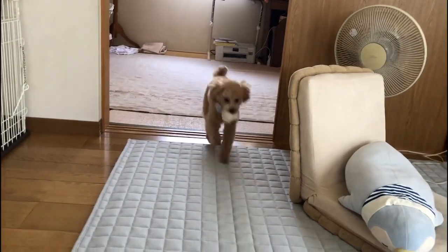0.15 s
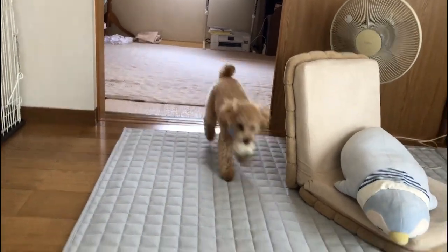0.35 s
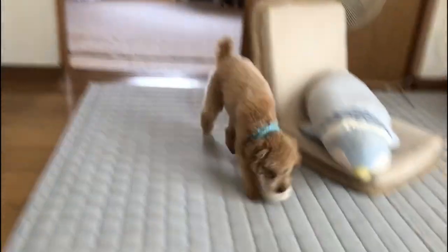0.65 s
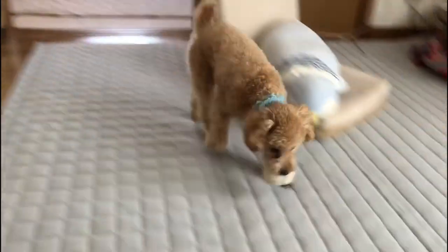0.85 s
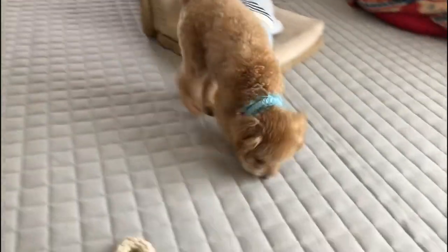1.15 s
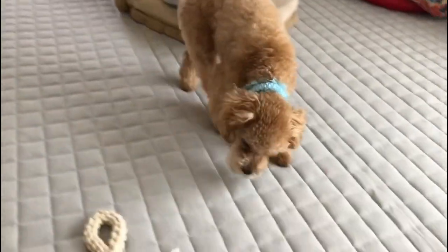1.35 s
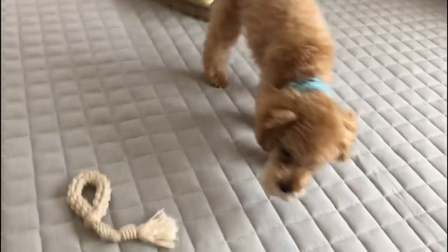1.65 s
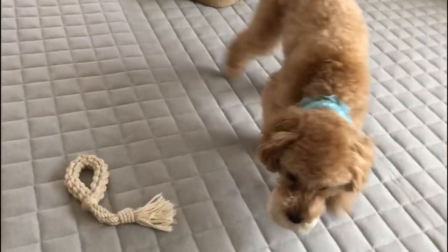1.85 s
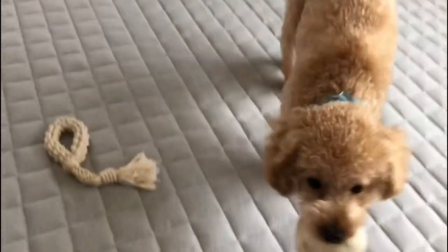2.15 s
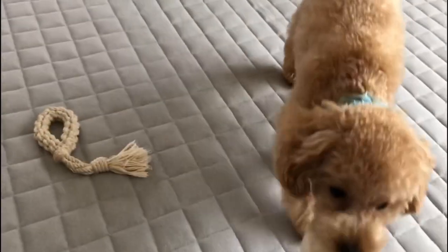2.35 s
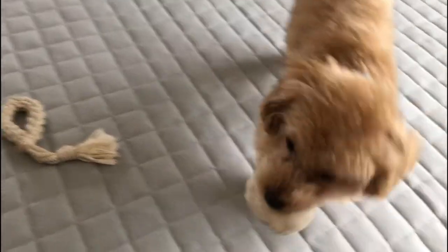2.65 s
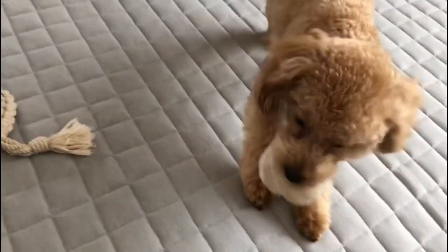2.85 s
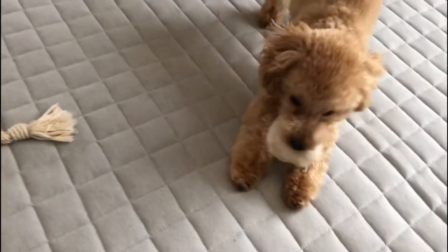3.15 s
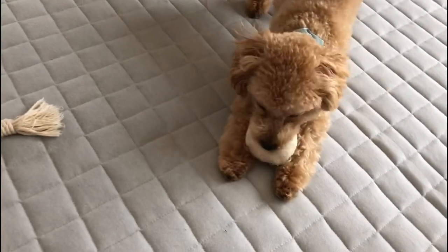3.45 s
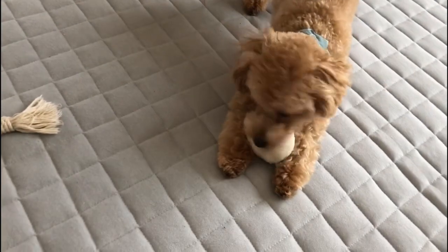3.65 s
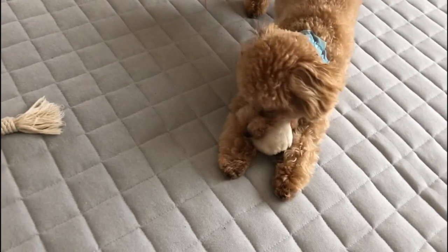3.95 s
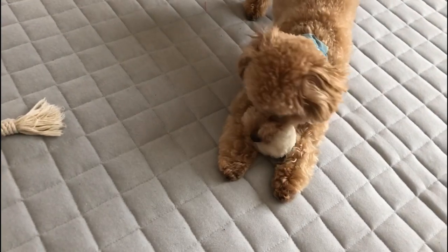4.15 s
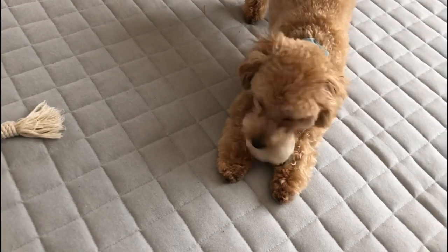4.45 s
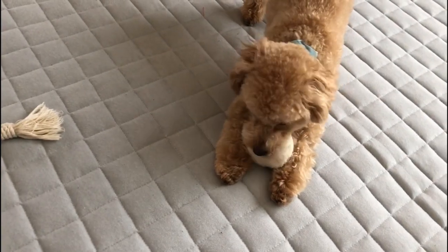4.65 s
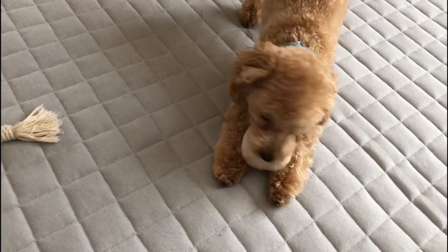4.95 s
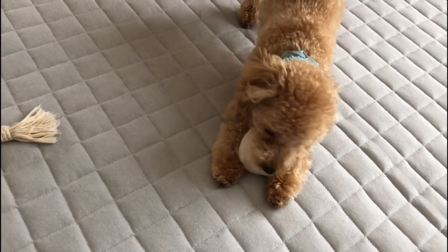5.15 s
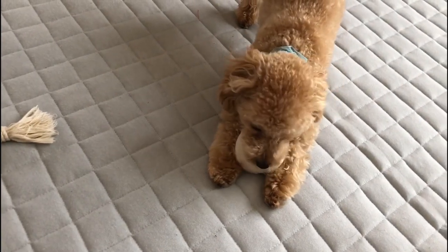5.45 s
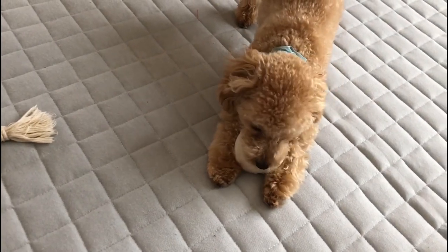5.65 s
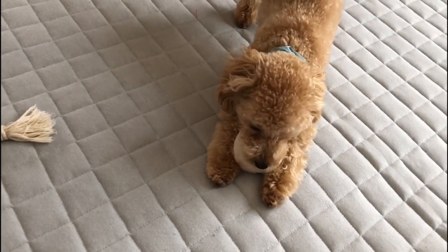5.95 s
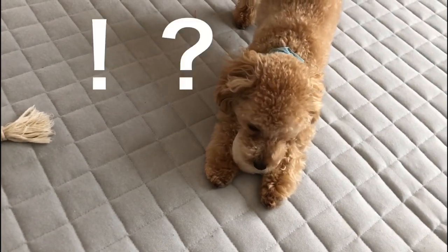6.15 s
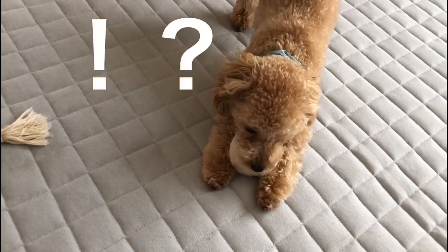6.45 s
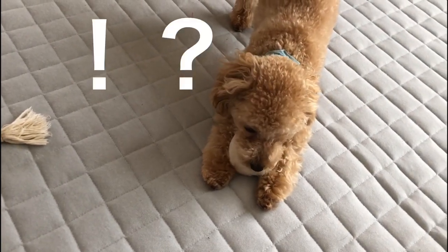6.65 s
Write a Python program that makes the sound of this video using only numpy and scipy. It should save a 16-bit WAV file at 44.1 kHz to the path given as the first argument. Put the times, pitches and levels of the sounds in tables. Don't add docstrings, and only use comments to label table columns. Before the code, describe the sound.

In a small room, claws tick lightly as a little dog trots in. One short soft squeak comes from a toy, then after a pause louder squeaks follow, ending in a quick pair with a sharp snap. Faint snorts and cloth rustle sit close to a phone microphone, over low fan hum, hiss, a distant buzzing engine and tiny bird chirps.

```python
import sys
import numpy as np
from scipy import signal
from scipy.fft import rfft, irfft, next_fast_len
from scipy.io import wavfile
from scipy.ndimage import uniform_filter1d

SR = 44100
rng = np.random.default_rng(int(sys.argv[2]) if len(sys.argv) > 2 else 0)


def amplitude_ratio(level_db):
    exponent = np.asarray(level_db, float) / 20
    return 10 ** exponent


def to_wav(sig):
    pcm = np.clip(np.atleast_2d(sig), -1, 1) * 32767
    pcm = np.round(pcm).astype(np.int16)
    wavfile.write(sys.argv[1], SR, pcm.T)


N = 299457
T = np.arange(N) / SR
SHORT = np.arange(SR // 4) / SR
LEAD_S = .007


def toy():
    # reed speaks in s, length in s, top pitch in Hz, level in dB,
    # share of the length at which the jaws press hardest.
    squeaks = [
        (.909, .0205, 1361, -32.5, 0.57),
        (3.5597, .0265, 1362, -25.5, 0.41),
        (4.3312, 0.037, 1457, -22.5, 0.39),
        (4.9241, 0.037, 1538, -21, .38),
        (5.5041, .0115, 1495, -15.5, .02),
        (5.5349, 0.034, 1478, -21, .45),
    ]
    # pitch sag half a length from the top, roundness of the arch,
    # air lost over the squeak in dB, settling in s, release in s.
    bites = [(.02, 1.5, 2, .0015, 0.0069), (0.025, 5.5, 2.5, 0.0016, 0.0083),
             (0.063, 1.5, 3.5, 0.0014, .012), (.09, .9, 3, .0018, 0.0079), (0.1, 0.76, 13, .0004, .003),
             (.015, 1.6, -.5, .0035, 0.0056)]
    # fundamental in dB, depth of the toy's resonances,
    # overtones from the fourth in dB, their tilt in dB per overtone, room in dB.
    covers = [(-1.5, 0.75, -9.5, 2, -9), (5, 1, -0.5, .2, -16), (3, 1.01, 0, -0.6, -14.5),
              (2.5, 1.1, 0.5, .3, -15), (5, .25, 6, 0.57, -17.5), (10.5, .95, 0, 2.5, -14.5)]
    pulses = [(0.27, -1), (0.16, -1), (.27, -1), (.3, -1), (.09, -1), (.15, 1)]
    overtones_db = (1, 0.13, -0.66, -0.5, -10, -8, -2.5, -4.5, -8.5, -8.5, -6)
    out = np.zeros(N)
    order = np.arange(1, 12)
    k = order[:, None]
    top_loss_db = 6 * (order - 8.0).clip(min=0)
    for (s, *arch), press, cover, (smear, way) in zip(squeaks, bites, covers, pulses):
        low_db, depth, upper_db, tilt_db, room_db = cover
        hz, db, asleep_db = squeeze(*arch, *press)
        t = s - LEAD_S + np.arange(len(hz)) / SR
        upper = (upper_db + tilt_db * (order.clip(max=8) - 4)) * (order > 3)
        tones_db = depth * np.array(overtones_db) + upper + low_db * (order == 1) - top_loss_db
        hz = uniform_filter1d(hz, size=110)
        db = uniform_filter1d(db, size=50)
        jitter = 1 + .003 * wobble(500, size=4096)[:len(t)]
        turn = 2 * np.pi * np.cumsum(hz * jitter) / SR
        weak_db = 0.084 * (k - 1) * (db - db.max())
        late_db = .25 * (k - 1) * asleep_db
        flutter_db = 1.6 * np.array([wobble(150, size=4096)[:len(t)] for _ in order])
        gains = amplitude_ratio(np.maximum(tones_db, -32)[:, None] + weak_db - late_db + flutter_db)
        reed = np.sum(gains * np.sin(k * turn + smear * k ** 2), axis=0)
        reed *= np.sqrt(2) / np.linalg.norm(amplitude_ratio(tones_db))
        leak = amplitude_ratio(-23.5) * band(5500, 9000)[:len(t)] * (1 + np.sin(turn))
        ends = signal.windows.tukey(len(t), .12)
        add(out, t[0], amplitude_ratio(db) * ends * (-np.sign(way) * reed + leak), room_db)
    return out


def squeeze(length_s, top_hz, top_db, peak, sag, roundness, lost_db, settle_s, release_s):
    t = np.arange(-LEAD_S, length_s, 1 / SR)
    u = t.clip(0) / length_s
    settle = np.exp(-t.clip(0) / settle_s)
    release = np.clip(1 - (length_s - t) / release_s, 0, 1) ** 2
    flat = sag * np.abs(2 * (u - peak)) ** roundness + .045 * settle + .17 * release
    asleep_db = 12.5 * (-t).clip(0) / (settle_s + .0006)
    db = top_db - lost_db * u - 2 * settle - 14.5 * release - asleep_db
    return top_hz * (1 - flat), db, asleep_db


def wall_snap():
    # start in s, level in dB, from Hz, to Hz, pitch fall in s, t60 in s.
    snap = (5.5032, -15.5, 1300, 120, .0035, .026)
    out = np.zeros(N)
    s, db, from_hz, to_hz, fall_s, t60_s = snap
    glide = (from_hz - to_hz) * fall_s * (1 - np.exp(-SHORT / fall_s))
    turn = 2 * np.pi * (to_hz * SHORT + glide)
    slap = amplitude_ratio(-13.5) * band(1800, 3400)
    add(out, s, amplitude_ratio(db - 60 * SHORT / t60_s) * touch() * (np.sin(turn) + slap), -16)
    return out


def claws():
    # time in s, peak in dB, centre in Hz, width in Hz, t60 in s.
    ticks = [(0.088, -46, 2600, 2200, 0.012), (.099, -40, 1690, 900, 0.0076),
             (0.144, -44.5, 4260, 9000, 0.011), (0.22, -45.5, 2880, 5570, 0.019),
             (.232, -55, 11000, 9000, .006), (.262, -58, 5500, 3000, 0.017), (1.53, -55, 4100, 1498, 0.017),
             (2.4905, -41.5, 1190, 1000, 0.025), (4.611, -51, 2410, 1490, 0.009),
             (4.6124, -51, 755, 500, 0.015), (4.913, -57.5, 3460, 1500, 0.032)]
    out = np.zeros(N)
    for s, db, hz, width_hz, t60_s in ticks:
        decay = amplitude_ratio(db - 3.5 - 60 * SHORT / t60_s)
        add(out, s - .0004, decay * touch() * band(hz, width_hz), -6)
    return out


def puffs():
    # time in s, half length in s, centre in Hz, width in Hz, level in dB.
    snorts = [(1.41, .035, 553, 500, -68.5), (2.527, 0.034, 1070, 950, -57.5),
              (2.508, 0.011, 2700, 3241, -67.5), (2.72, 0.019, 8000, 8000, -77),
              (2.93, 0.034, 7900, 8660, -71.5), (3.36, .04, 3930, 5000, -76.5),
              (4.785, 0.01, 7900, 9040, -76.5), (4.87, 0.0096, 7950, 8700, -69.5),
              (5.3, 0.042, 6050, 7610, -79), (5.49, 0.0087, 7000, 9100, -69.5)]
    toy_air = [
        (3.552, .006, 3000, 8000, -67),
        (4.322, .008, 3000, 8000, -65),
        (4.965, .01, 400, 700, -62),
        (5.565, .01, 500, 900, -56),
    ]
    out, middle_s = np.zeros(N), SHORT[-1] / 2
    for s, half_s, hz, width_hz, db in [*snorts, *toy_air]:
        swell = np.exp(-.5 * ((SHORT - middle_s) / half_s) ** 2)
        grain = amplitude_ratio(db + 2.2 * wobble(150, size=len(SHORT)))
        add(out, s - middle_s, grain * band(hz, width_hz) * swell, -8)
    return out


def engine():
    # multiple of the firing rate, dB before the engine turns, dB after.
    orders = [(3.7, -8.5, -18), (5.13, 2, -13), (6.01, 3.5, 6.5), (6.98, -13, -23), (8.24, -14, -20),
              (8.97, -12.5, -3.5), (10, -5, -21), (10.85, -8.5, -14), (12.12, -10, -13.5), (13.13, -5, -6),
              (13.94, -8.5, -15), (14.75, -29.5, -4.5), (16.05, -5.5, -8.5), (16.77, -14.5, -17),
              (18, -7, -24.5), (19.04, -4, -4.5), (20.04, -1.5, -12.5), (20.84, -7.5, -2),
              (21.9, -4.5, -12.5), (22.2, -11, -26.5)]
    # frequency in Hz, level in dB.
    rasp_spectrum = [(550, -39.5), (700, -5.5), (1100, 2), (1280, -6.5), (1500, -7.5), (2150, -11),
                     (3200, -15), (6000, -35)]
    drone_spectrum = [(180, -28.5), (260, 1.5), (330, -7.5), (500, -14.5), (700, -21)]
    surge_spectrum = [(200, -24), (270, 1.5), (380, -4.5), (600, -18.5)]
    hz, rasp_gain, drone_gain, surge_gain = throttle()
    turn = 2 * np.pi * np.cumsum(hz * (1 + .001 * wobble(8))) / SR
    coarse = T[::256]
    turned = np.clip((coarse - 3.3) / 0.36, 0, 1)
    low, high = np.zeros(N), np.zeros(N)
    for k, near_db, far_db in orders:
        drift_db = 2.9 * np.interp(coarse, np.linspace(0, T[-1], num=50), rng.standard_normal(size=50))
        level = np.interp(T, coarse, amplitude_ratio(near_db + turned * (far_db - near_db) + drift_db))
        line = level * np.sin(k * turn + rng.uniform(0, 2 * np.pi))
        if k < 12:
            low += line
        else:
            high += line
    high = unit(high) + amplitude_ratio(-10) * (T < 3.3) * np.sin(39 * turn)
    gate = 1 + .5 * np.sin(turn)
    rasp = amplitude_ratio(-2.5) * high + amplitude_ratio(-4.0) * gate * shaped(rasp_spectrum)
    drone = amplitude_ratio(-1) * unit(low) + amplitude_ratio(-6.0) * gate * shaped(drone_spectrum)
    return rasp_gain * rasp + drone_gain * drone + surge_gain * shaped(surge_spectrum)


def throttle():
    # from s, to s.
    runs = [
        (-1, 3.05),
        (4, 4.27),
        (5.19, 8),
    ]
    # rasp at start in dB, rasp at end in dB, drone in dB,
    # exhaust surge at start in dB, surge at end in dB.
    levels = [(-71.5, -66, -72, -70, -65.5), (-68, -69, -74.5, -63.5, -81), (-65, -68.5, -65, -64.5, -70)]
    pull_hz, coast_hz = 55.1, 46
    spin_up_s, run_down_s, kick_s, linger_s = .02, .035, .035, .6
    speed, rasp, drone, surge = np.zeros((4, N))

    def kick(s):
        x = s.clip(0) / kick_s
        return x * np.exp(1 - x)

    for (on, off), (from_db, to_db, drone_db, on_db, off_db) in zip(runs, levels):
        up, down = (T - on).clip(0), (T - off).clip(0)
        pull = (1 - np.exp(-up / spin_up_s)) * np.exp(-down / run_down_s)
        speed += pull
        rasp += pull * amplitude_ratio(np.interp(T, (on, off), (from_db, to_db)))
        drone += pull * amplitude_ratio(drone_db)
        surge += amplitude_ratio(on_db) * kick(T - on + spin_up_s) + amplitude_ratio(off_db) * kick(T - off + kick_s)
        surge += amplitude_ratio(-76) * (down > 0) * np.exp(-down / linger_s)
    return coast_hz + (pull_hz - coast_hz) * speed, rasp + amplitude_ratio(-88), drone + amplitude_ratio(-82), surge


def bird():
    # start in s, length in s, from Hz, to Hz, level in dB.
    chirps = [(1.94, .12, 5000, 3300, -73), (4.08, .13, 5000, 3000, -73), (6.06, .11, 4800, 3200, -74)]
    out = np.zeros(N)
    for s, length_s, from_hz, to_hz, db in chirps:
        u = np.clip(SHORT / length_s, 0, 1)
        hz = from_hz + (to_hz - from_hz) * u + 900 * wobble(300, size=len(u))
        swell = np.sqrt(np.sin(np.pi * u).clip(0))
        add(out, s, amplitude_ratio(db - 2.5) * swell * np.sin(2 * np.pi * np.cumsum(hz) / SR), 6)
    return out


def hum():
    # time in s, level in dB.
    fan_level = [(0, -61.5), (.55, -63), (.75, -66.5), (3.1, -65.5), (6.79, -66.5)]
    # frequency in Hz, level in dB.
    rumble_spectrum = [(12, -68), (25, -38), (42, -12), (70, -4), (130, -9.5), (200, -11.5), (300, -24.5),
                       (390, -37.5)]
    hiss_spectrum = [(150, -8.5), (250, -5), (400, -9), (1200, -16), (2500, -22), (6000, -27), (12000, -31),
                     (16200, -35.5)]
    hum_db = np.interp(T, *np.transpose(fan_level))
    blade_turn = 2 * np.pi * np.cumsum(81 + 2 * wobble(3)) / SR
    blade = amplitude_ratio(hum_db - hum_db.mean() - 5 + 3 * wobble(6)) * np.sin(blade_turn)
    rumble = amplitude_ratio(hum_db + 1.2 * wobble(2.2)) * (shaped(rumble_spectrum) + blade)
    hiss = amplitude_ratio(-68 + 0.53 * wobble(2.35)) * shaped(hiss_spectrum)
    return rumble + hiss


def add(out, s, x, room_db):
    # frequency in Hz, t60 in s.
    room_t60 = [(200, 0.59), (1400, 0.41), (4000, 0.32), (8000, 0.26), (15000, 0.15)]
    hz, t, z = signal.stft(rng.standard_normal(SR // 2), SR, nperseg=128)
    decay = amplitude_ratio(-60 * t / along(room_t60, hz)[:, None])
    tail = signal.istft(z * decay, SR, nperseg=128)[1]
    tail = np.pad(tail, (round(0.0046 * SR), 0))
    wet = amplitude_ratio(room_db) * signal.fftconvolve(x, tail / np.linalg.norm(tail))
    wet[:len(x)] += x
    start = round(s * SR)
    out[start:start + len(wet)] += wet[:N - start]


def touch():
    return np.clip(SHORT / .0005, 0, 1) ** 2


def band(hz, width_hz):
    def peak(f):
        damping = (f * width_hz) ** 2
        return damping / ((hz ** 2 - f ** 2) ** 2 + damping)
    return unit(filtered(rng.standard_normal(len(SHORT)), peak))


def shaped(points):
    shut = [(points[0][0] / 2, -120), *points, (points[-1][0] * 2, -120)]
    return unit(filtered(rng.standard_normal(N), lambda hz: amplitude_ratio(along(shut, hz))))


def filtered(x, gain):
    m = next_fast_len(x.shape[-1] + 4096)
    return irfft(rfft(x, m) * gain(np.fft.rfftfreq(m, 1 / SR)), m)[..., :x.shape[-1]]


def along(points, hz):
    f, v = np.transpose(points)
    return np.interp(np.log(hz + 1), np.log(f + 1), v)


def wobble(rate_hz, size=N):
    knots = rng.standard_normal(size // 64 + 8)
    place = np.arange(size) * rate_hz / SR
    step = place.astype(int)
    ease = .5 - .5 * np.cos(np.pi * (place - step))
    return knots[step] + ease * (knots[step + 1] - knots[step])


def unit(x):
    return x / np.sqrt(np.mean(x ** 2) + 1e-20)


def scene():
    dog = toy() + wall_snap() + claws() + puffs()
    outside = engine() + bird()
    return (dog + outside + hum())[None]


def band_limit(x):
    return signal.sosfilt(signal.butter(12, 16670, fs=SR, output="sos"), x)


def record(dry):
    # low in Hz, top in Hz.
    mic_band = (22, 16050)
    low_hz, top_hz = mic_band

    def response(f):
        return np.clip((top_hz - f) / 250 + .5, 0, 1) * f ** 2 / (f ** 2 + low_hz ** 2)

    return band_limit(filtered(dry, response))


dry = scene()
out = record(dry)
to_wav(out)
```